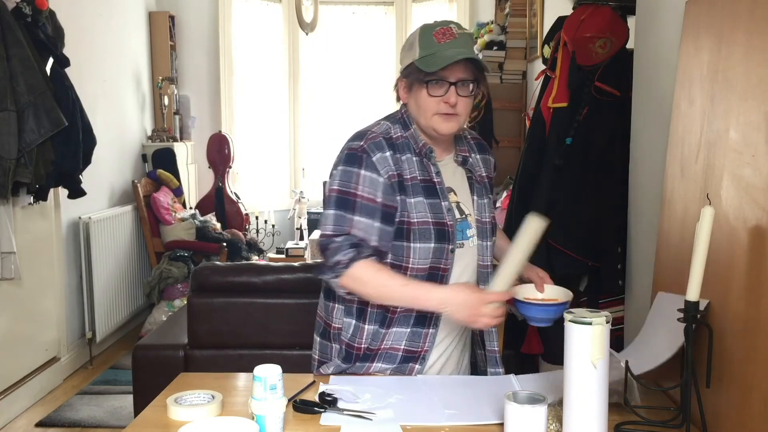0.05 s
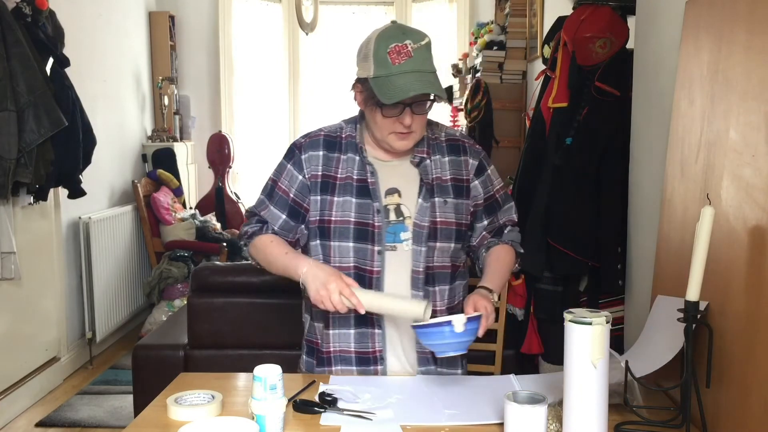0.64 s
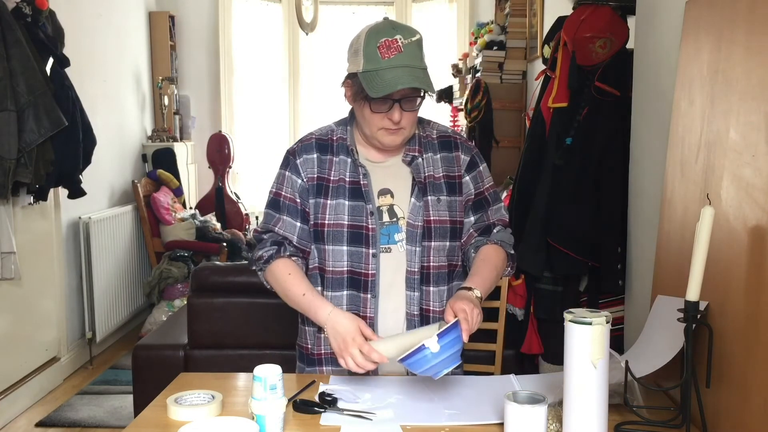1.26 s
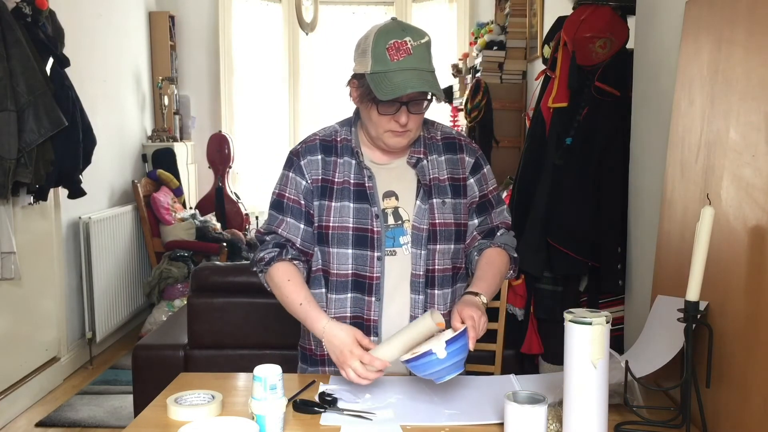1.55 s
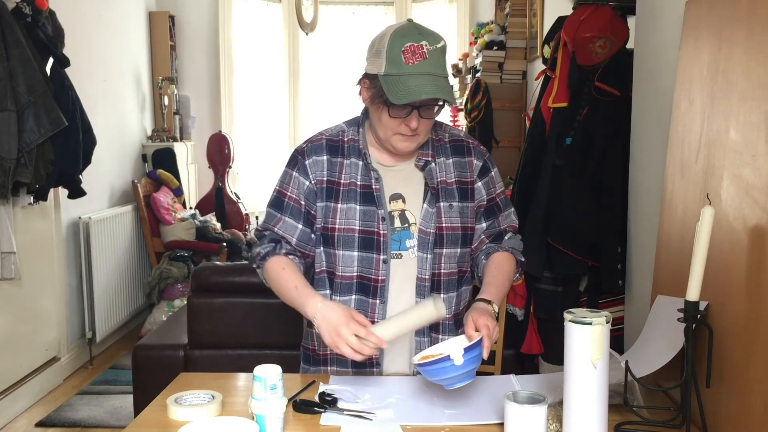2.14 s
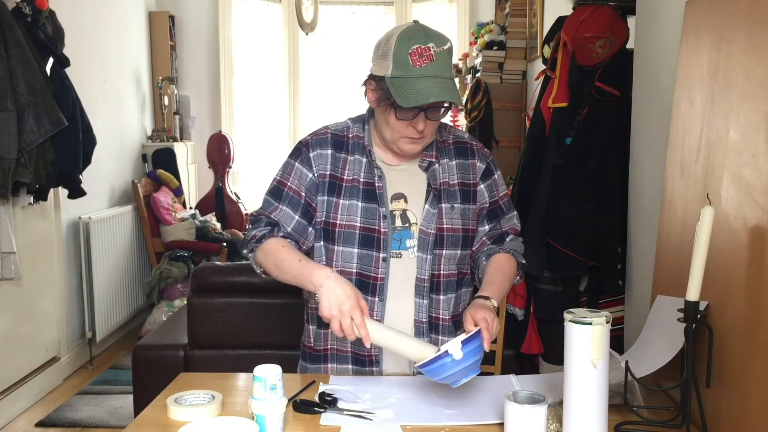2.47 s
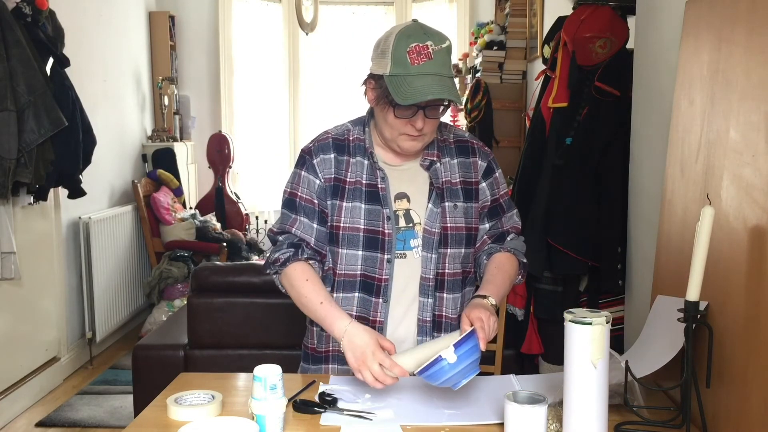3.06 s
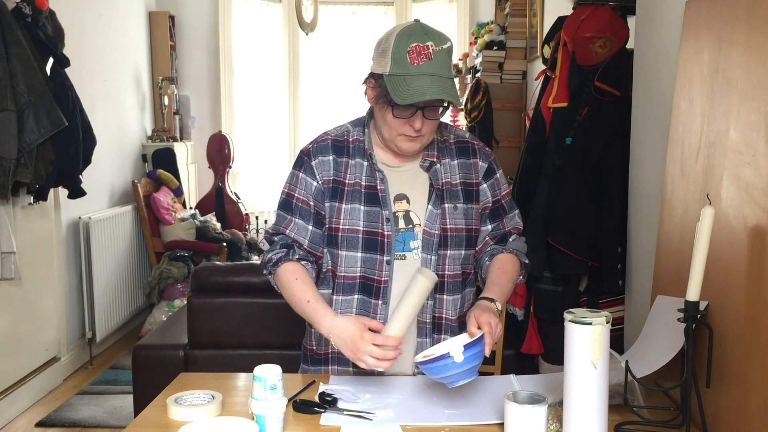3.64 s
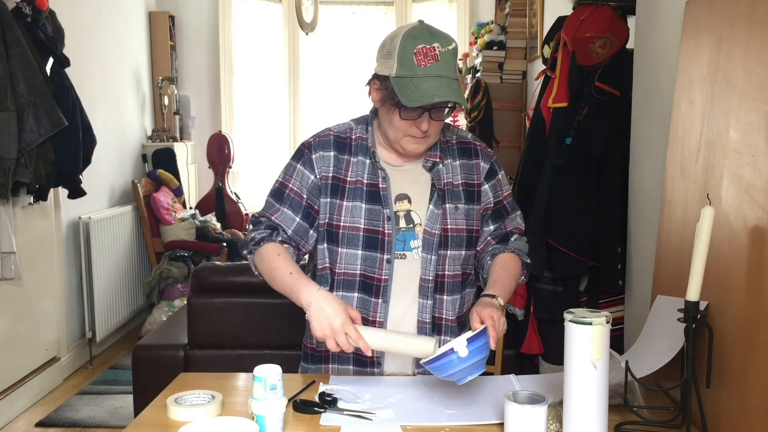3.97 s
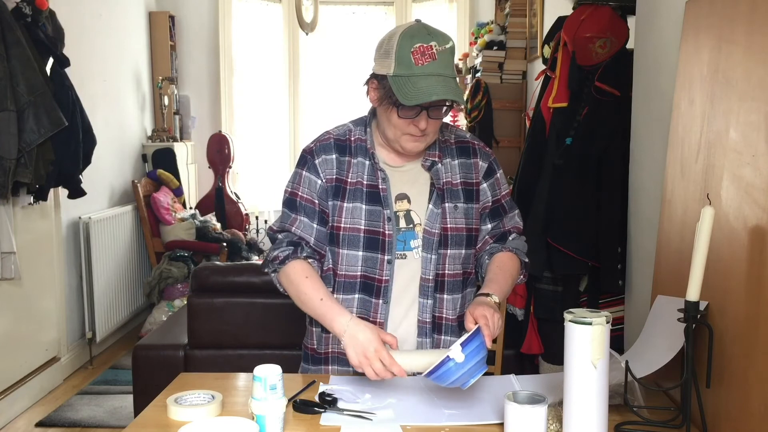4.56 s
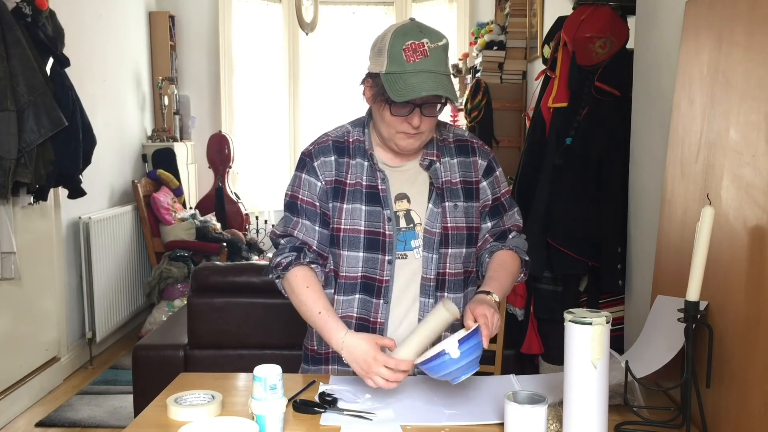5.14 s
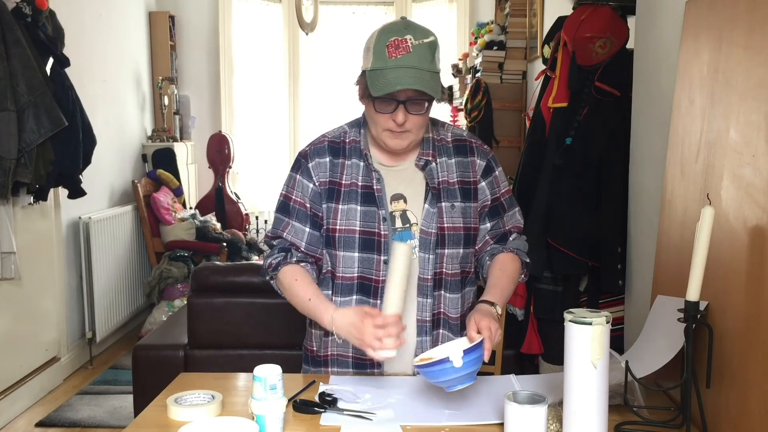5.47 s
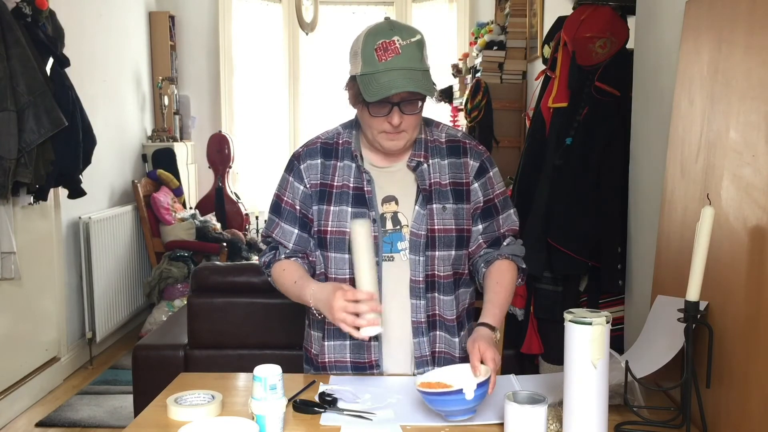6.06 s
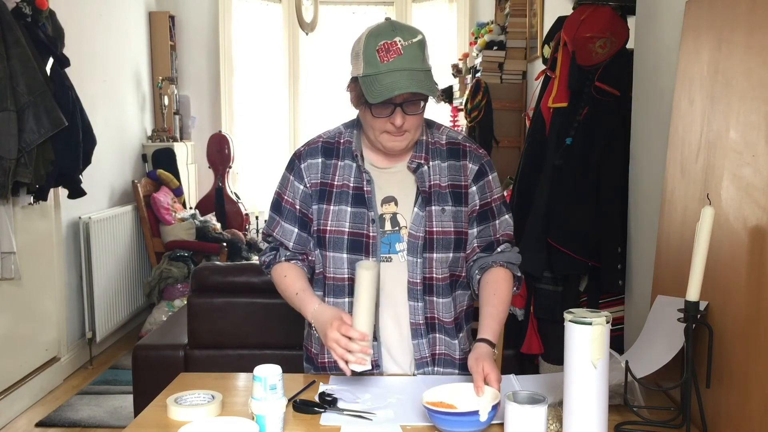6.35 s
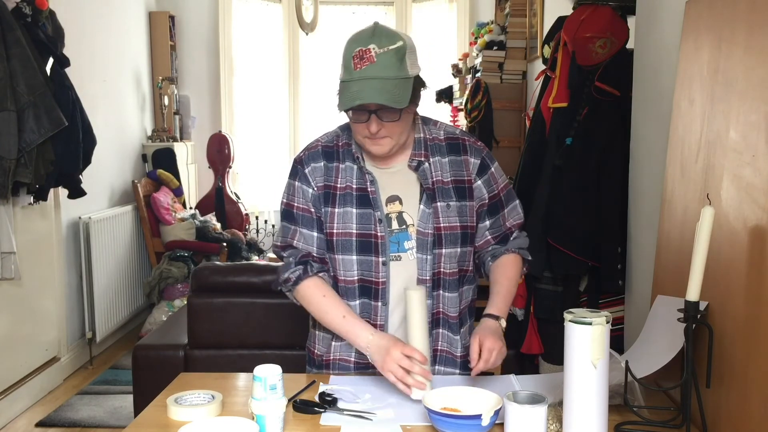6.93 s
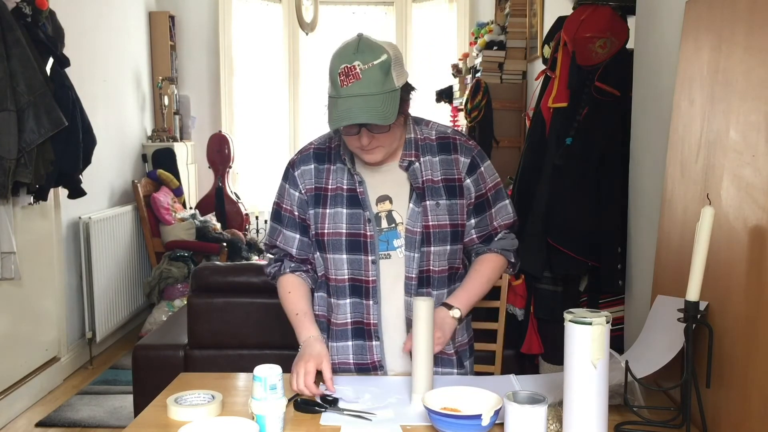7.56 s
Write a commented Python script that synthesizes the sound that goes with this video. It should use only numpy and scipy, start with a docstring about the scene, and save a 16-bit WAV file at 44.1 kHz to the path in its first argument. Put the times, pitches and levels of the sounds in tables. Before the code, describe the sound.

Dry lentils rattle down a cardboard tube three times and are shaken, then a bowl and the tube knock onto a wooden table.

```python
"""A bowl of dry lentils clacks as it is lifted. Three times a cardboard tube crunches into them and is
tipped upright: they slide down, hissing, rattling and sounding its wall and hollow note. The tube is
shaken; the filling swishes and lands as a lump. The bowl rocks flat on a wooden table, the full tube
thuds down, scissors click on the tabletop. Throughout: a small furnished room with a faint hum."""
import sys
import numpy as np
from scipy import signal
from scipy.fft import rfft, irfft, next_fast_len
from scipy.io import wavfile
from scipy.ndimage import uniform_filter1d

SR = 44100
rng = np.random.default_rng(int(sys.argv[2]) if len(sys.argv) > 2 else 0)


def materialize(psi):
    """Save the field psi as 16-bit PCM at rate SR to the path in sys.argv[1].

    A 1-D psi becomes a single channel; in a 2-D psi each row is a channel.
    """
    bounded = np.clip(np.atleast_2d(psi).T, -1, 1)
    quanta = np.round(bounded * 32767).astype(np.int16)
    wavfile.write(sys.argv[1], SR, quanta)


N = 344179
TIME_S = np.arange(N) / SR

# tube ploughs in, lentils creep on until it is tipped: t/s, crunch/dB, release/s, creep/dB
SCOOPS = [(0.958, -52, 0.13, -71.5), (2.63, -52, .21, -71.5), (4.271, -54, 0.2, -68)]
# short shoves of the tube: t/s, crunch/dB, attack/s, hold/s, release/s, wall re crunch/dB
SHOVES = [(1.276, -56.5, 0.12, .018, 0.027, -1), (2.2, -75, .05, 0.26, .2, -3),
          (2.451, -56, .02, 0.034, 0.085, -20), (4.061, -58, .02, .06, 0.11, -7)]
# flow down the tube: first slip/s, full flow/s, run-out/s, flow rise/dB, hiss/dB, rattle/dB,
# wall/dB, hollow note/Hz
POURS = [(1.352, 1.729, 1.931, 27.5, -40.5, -45.5, -58.5, 1270),
         (3.209, 3.42, 3.65, 15.5, -42, -50, -54.5, 1280),
         (4.948, 5.212, 5.38, 10, -46, -54.5, -57.5, 1090)]
# bulk of a pour hits the tube's end: t/s, wall/dB, rattle/dB, hold/s, release/s
LANDINGS = [(1.687, -48, -51.5, 0.15, 0.16), (3.477, -40.5, -41.5, 0.018, 0.11),
            (5.351, -59.5, -46.5, .015, 0.101)]
# filling jumps in the tube, and a few stray lentil ticks: t/s, level/dB, attack/s, release/s
JOLTS = [(.524, -61, .065, .055), (2.12, -62, 0.0087, .07), (2.3, -66, .006, 0.066),
         (5.847, -39, .037, 0.083), (6.023, -49.5, 0.013, 0.075), (6.213, -54.5, 0.027, 0.041),
         (7.091, -48, 0.0054, 0.11), (7.25, -74, 0.041, .05)]

# blows, each with its own loudness and brightness: t/s, level/dB, tilt/(dB/octave)
BOWL_LIFT = [(.006, -25, 1.5), (.012, -22.5, 1)]
BOWL_TAPS = [(.736, -46.5, -2), (.747, -44.5, -6), (4.056, -45.5, -2), (4.068, -46.5, -5.5)]  # tube pushed into the bowl
FINGER_TICKS = [(.355, -58.5, 1), (.361, -60, -2), (.376, -64.5, -6.5), (.613, -67, -2), (.631, -72.5, -7),
                (2.132, -53, 1), (3.903, -74, 10)]  # regripping the tube
SLUMPS = [(1.666, -61, -4), (1.703, -59, 3), (3.471, -39, 1.5), (3.485, -34.5, 3), (5.846, -33.5, -4),
          (5.866, -53, 0.5)]  # filling drops to the tube's end
BOWL_DOWN = [(6.469, -14, 0.25), (6.610, -25.5, -2.5), (6.619, -35.5, -4), (6.642, -31.5, -4)]  # foot meets the table, rocks flat
TUBE_DOWN = [(6.420, -55, -0.56), (7.094, -23, -0.2)]  # table brushed, then full tube stood on it
SCISSOR_CLICKS = [(7.609, -65, 3), (7.678, -40.5, 0.4)]

# clear modes: f/Hz, level/dB, t60/s
LIFT_MODES = [(151.6, 2.5, 0.17), (193, -10.5, 0.51), (397, 1, 0.3), (450, 4.5, 0.17), (604, -8.5, .18),
              (1000, 2, 0.068), (1286, -4.5, 0.15), (1670, -8, .15), (2110, -11.5, .12)]
BOWL_MODES = [(444, -24, 0.068), (522, -4, 0.19), (643, -8.5, 0.24), (1010, -1, 0.23), (1112, 5, 0.3),
              (1390, 5, 0.053), (1654, 4, 0.085), (2170, -5, 0.16), (2900, -6, 0.09), (3550, 7, 0.062),
              (5469, 2, .12)]
WALL_MODES = [(1254, 2, 0.17), (1450, 0, 0.13), (2272, -6, 0.12), (3375, -21, 0.29), (4050, -10, 0.16),
              (4414, -12.5, 0.13)]
TUBE_MODES = [(418, 0.5, 0.12), (515, -6.5, 0.21), (602, -2.5, 0.21), (819, 0.5, 0.2), (1100, -6, 0.29),
              (1373, 6, 0.14), (1628, 2.5, 0.12), (2078, 3, 0.13)]
TABLE_MODES = [(118, -7.5, 0.0997), (149.6, -6.5, 0.14), (174, -16, 0.18), (278, -12.5, 0.16),
               (291, -15, 0.23), (441, -13.5, 0.15), (588, -9, .2), (650, -3, .2), (718, -8, 0.18),
               (815, -11.5, 0.26), (950, -5, 0.1), (1046, -2.5, 0.2), (1152, -8.5, 0.22), (1322, 1.5, 0.15),
               (1470, -23.5, 0.18), (1636, -20, 0.2), (1950, -17.5, 0.18), (2670, -27.5, 0.1),
               (3680, -32.5, 0.16)]
THUD_MODES = [(65.1, -23.5, 0.29), (138, -1, 0.099), (172.4, -4, 0.077), (158.6, -19.5, 0.41),
              (160.7, -16, 0.35), (223.5, -14.5, 0.2)]  # tabletop; a low thud with a faint ring near 160 Hz
SCISSOR_MODES = [(206, -1, 0.1), (290, -11.5, 0.22), (1287, 1, 0.16), (1316, 4, 0.24), (1430, -19, .12),
                 (1780, -9.5, .13), (2140, -10, 0.14)]

# spectra of dense, short-lived modes: f/Hz, density/dB
LIFT_COLOUR = [(60, -36.5), (140, -2), (217, -8.5), (417, -0.5), (880, -8.5), (1050, -2), (1330, 0.5),
               (1810, -13), (2120, -10), (2700, -16), (4200, -18), (8500, -27.5), (15500, -46.5)]
TAP_COLOUR = [(130, -39), (220, -30.5), (500, -12), (640, -5), (870, -17), (1100, -6.5), (1300, 2),
              (1520, -21), (2150, -14), (2600, -21), (3700, -16), (4300, -27), (5600, -17.5), (8000, -29),
              (15600, -38)]
TICK_COLOUR = [(300, -18.5), (750, -5), (1150, 1.5), (1600, -0.5), (2200, 1), (3000, -7), (4200, -6.5),
               (7000, -17.5), (15000, -29)]
SLUMP_COLOUR = [(130, -50), (220, -27.5), (446, -5), (917, -4.5), (1140, 2.5), (1660, 0.5), (1910, -12),
                (2420, -1.5), (2650, -11), (4500, -18), (5850, -60), (9900, -120)]
TABLE_COLOUR = [(50, -29), (90, -15.5), (150, -6), (250, -7), (340, -12), (480, -5), (640, -5), (950, -0.5),
                (1350, -3.5), (1700, -9), (2700, -22.5), (4200, -31), (5200, -45.5), (8000, -53),
                (15000, -74.5)]
THUD_COLOUR = [(30, -51.5), (50, -24), (150, -7.5), (250, -15), (500, -28.5), (950, -31), (1400, -38),
               (3500, -50), (6000, -74)]
CLICK_COLOUR = [(65, -23.5), (110, -16), (224, -3), (350, -11), (568, -6.5), (750, -12.5), (1330, -3),
                (1840, -9.5), (3060, -20.5), (5080, -37.5), (14000, -44)]

# spectra of lentil contacts: f/Hz, density/dB
CRUNCH_COLOUR = [(180, -43), (300, -18), (493, -9), (545, -18), (654, -8.5), (747, -15), (1130, -4.5),
                 (1520, -9.5), (2310, -3.5), (2630, -5.5), (3670, -1), (9290, -8.5), (15800, -16)]
HISS_COLOUR = [(1500, -30.5), (3500, -1.5), (7000, -2.5), (7700, -2), (9300, 2.5), (10500, -5),
               (11600, 1.5), (15500, -1)]
RATTLE_COLOUR = [(400, -58), (1200, -34), (2800, -8.5), (3500, -4), (5000, -3.5), (6900, 0.5), (7700, -9),
                 (15000, -13.5)]
SWISH_COLOUR = [(700, -20), (1300, -11), (2400, -14), (3200, -8.5), (5000, -6.5), (6500, -5.5), (7600, -10),
                (9000, -6.5), (10500, -13), (12000, -9.5), (15800, -11.5)]

# tube resonances: f/Hz, width/Hz, level/dB
CARDBOARD = [(810, 600, -11), (1097, 93, 2.5), (1334, 95, 0), (1637, 86, 1.5), (1823, 140, 2),
             (2290, 430, -1.5), (4530, 240, -5.5)]
AIR_COLUMN = [(407, 50, -10.5), (670, 89, -3.5), (810, 85, -3), (1282, 51, -3), (1750, 63, -3),
              (2510, 110, -6.5)]  # nearly empty tube

# room air: f/Hz, density/dB
AIR_COLOUR = [(15, -52), (27, -17), (102, -4.5), (123, -13.5), (161, -11), (241, -13.5), (403, -15.5),
              (500, -18), (637, -18), (1090, -18.5), (1550, -19.5), (2520, -23), (3220, -22.5),
              (15800, -32.5)]
# room decay: f/Hz, t60/s
ROOM_T60 = [(100, 0.45), (300, 0.28), (1200, 0.36), (3000, .36), (6000, 0.23), (14000, 0.12)]


def pouring():
    """Flow grows with tilt, lands, runs out: sliding hisses, tumbling rattles, both sound the wall."""
    tumble_db_per_s, pile_damping_db_per_s = 11, 46
    wall_share = 0.57  # of the flow's rise in dB
    hiss, rattle, wall = np.zeros((3, N))
    for slip_s, full_s, out_s, rise_db, hiss_db, rattle_db, wall_db, _ in POURS:
        running = swell(slip_s, attack_s=0.083, hold_s=out_s - slip_s, release_s=0.094, curve=1.22)
        flow_db = -rise_db * np.clip((full_s - TIME_S) / (full_s - slip_s), 0, 1) ** 0.99
        filling_s = np.clip(TIME_S, full_s, out_s) - full_s
        hiss += running * amp(hiss_db + flow_db)
        rattle += running * amp(rattle_db + flow_db + tumble_db_per_s * filling_s)
        wall += running * amp(wall_db + wall_share * flow_db - pile_damping_db_per_s * filling_s)
    for at_s, wall_db, rattle_db, hold_s, release_s in LANDINGS:
        landing = swell(at_s, attack_s=0.018, hold_s=hold_s, release_s=release_s, curve=1.2)
        wall = np.hypot(wall, amp(wall_db) * landing)
        rattle = np.hypot(rattle, amp(rattle_db) * landing)
    return (hiss * grains(HISS_COLOUR, per_s=7000, spread_db=1.5)
            + rattle * grains(RATTLE_COLOUR, per_s=2800, spread_db=6)
            + wall * resonant(contacts(per_s=750, spread_db=3.5), CARDBOARD))


def scooping():
    """Lentils crunch in the bowl and tick against the tube's mouth."""
    stroke_attack_s, stroke_hold_s, mouth_lag_s = 0.12, 0.058, 0.068
    crunch, mouth = np.zeros((2, N))
    for (at_s, db, release_s, creep_db), (tipped_s, *_) in zip(SCOOPS, POURS):
        stroke = swell(at_s, stroke_attack_s, stroke_hold_s, release_s, curve=2.05)
        entry = swell(at_s + mouth_lag_s, stroke_attack_s, stroke_hold_s, release_s, curve=2.05)
        creep = amp(creep_db) * swell(at_s, stroke_attack_s, tipped_s - at_s, release_s, curve=1.8)
        crunch += amp(db) * stroke + creep
        mouth += amp(db - 14) * entry + amp(-3) * creep
    for at_s, db, attack_s, hold_s, release_s, wall_db in SHOVES:
        shove = amp(db) * swell(at_s, attack_s, hold_s, release_s, curve=1.03)
        crunch += shove
        mouth += amp(wall_db) * shove
    return (crunch * grains(CRUNCH_COLOUR, per_s=3200, spread_db=1.5)
            + mouth * resonant(contacts(per_s=570, spread_db=3), CARDBOARD))


def pattering():
    """The first lentils drum on the tube's bare end until they cover it."""
    bare = swell(1.664, attack_s=0.0066, hold_s=0.15, release_s=0.103, curve=0.97)
    return amp(-49.5) * bare * resonant(contacts(per_s=900, spread_db=3), AIR_COLUMN)


def swirling():
    """Lentils shift in the lifted bowl and come to rest."""
    motion = swell(0.013, attack_s=0.012, hold_s=0.15, release_s=0.105, curve=1.1)
    return amp(-45) * motion * grains(CRUNCH_COLOUR, per_s=1700, spread_db=2.5)


def shaking():
    """The filling is thrown up with a swish and lands as one lump."""
    thrown = sum(amp(db) * swell(at_s, attack_s, 0, release_s, curve=1.25)
                 for at_s, db, attack_s, release_s in JOLTS)
    swish = thrown * grains(SWISH_COLOUR, per_s=8400, spread_db=6.5)
    lump = blows(SLUMPS, TUBE_MODES, SLUMP_COLOUR, ring_db=-3, t60_s=0.2, snap_db=-1.5, wet_db=-12.5)
    return swish + lump


def hollow_note_hz(t):
    """Pitch of the tube's air: rises as a scoop fills the mouth, and again at full flow."""
    scoop_rise_s, pour_ratio = 0.17, 1.155
    points = []  # t/s, f/Hz
    for (scoop_s, *_), (slip_s, full_s, out_s, *_, note_hz) in zip(SCOOPS, POURS):
        points += [(scoop_s - scoop_rise_s / 2, 1237), (scoop_s + scoop_rise_s / 2, 1910)]
        points += [(slip_s, note_hz), (full_s, note_hz), (out_s, note_hz * pour_ratio)]
    return np.interp(t, *np.transpose(points))


def in_tube(x, peak_db, width_hz, patchy_db):
    """The shifting pile moves the hollow note and varies the rattle's fine colour."""
    hz, t, spectra = signal.stft(x, SR, nperseg=1024, noverlap=768)
    note_db = peak_db / (1 + (2 * (hz[:, None] - hollow_note_hz(t)) / width_hz) ** 2)
    patches = uniform_filter1d(rng.standard_normal(spectra.shape), size=4, axis=0)
    patches = uniform_filter1d(patches, size=16, axis=1)
    patches_db = patchy_db * unit(patches) / (1 + hz[:, None] / 9000)
    return signal.istft(spectra * amp(note_db + patches_db), SR, nperseg=1024, noverlap=768)[1][:N]


def contacts(per_s, spread_db):
    """Lentil collisions in the room: random ticks of uneven size, rms 1."""
    hits = rng.random(N) < per_s / SR
    sizes = amp(spread_db * np.clip(rng.standard_normal(N), -2, 2))
    return unit(in_room(hits * sizes * rng.choice([-1, 1], N), wet_db=-4.5))


def grains(colour, per_s, spread_db):
    """Collisions shaped by a spectrum, rms 1."""
    return unit(coloured(contacts(per_s, spread_db), lambda hz: along(colour, hz)))


def handling():
    """Knocks of bowl, tube, fingers and scissors."""
    lift = blows(BOWL_LIFT, LIFT_MODES, LIFT_COLOUR, ring_db=-6.5, t60_s=0.033, snap_db=-10, wet_db=-7.5)
    taps = blows(BOWL_TAPS, BOWL_MODES, TAP_COLOUR, ring_db=-4, t60_s=0.033, snap_db=-24, wet_db=-8.5)
    ticks = blows(FINGER_TICKS, WALL_MODES, TICK_COLOUR,
                  ring_db=-9.5, t60_s=0.12, snap_db=-11, wet_db=-14.5)
    bowl = blows(BOWL_DOWN, TABLE_MODES, TABLE_COLOUR,
                 ring_db=-4.5, t60_s=0.072, snap_db=-5.5, wet_db=-8, build_up_s=0.012)
    tube = blows(TUBE_DOWN, THUD_MODES, THUD_COLOUR, ring_db=5.5, t60_s=0.035, snap_db=-9.5, wet_db=-4)
    scissors = blows(SCISSOR_CLICKS, SCISSOR_MODES, CLICK_COLOUR,
                     ring_db=-3, t60_s=0.033, snap_db=-8, wet_db=-1.5, build_up_s=0.00089)
    return lift + taps + ticks + bowl + tube + scissors


def blows(events, modes, colour, ring_db, t60_s, snap_db, wet_db, build_up_s=0.004):
    """Each blow: a snap, a burst of dense modes, a few clear ones ringing on."""
    track = np.zeros(N + SR)
    t = np.arange(SR * 2 // 3) / SR
    for at_s, db, tilt_db in events:
        burst = rng.standard_normal(len(t)) * fade(t, t60_s)
        burst[0] += amp(snap_db) * np.linalg.norm(burst)
        dense = coloured(evened(in_room(burst, wet_db)), lambda hz: along(colour, hz))
        ring = np.zeros(len(t))
        for k, (mode_hz, mode_db, mode_t60_s) in enumerate(modes):
            gain = (-1) ** k * amp(mode_db + rng.standard_normal())
            ring += gain * fade(t, mode_t60_s) * np.sin(2 * np.pi * mode_hz * t)
        ring *= 1 - np.exp(-t / build_up_s)  # standing waves form
        blow = unit(dense) + amp(ring_db) * unit(ring)
        blow = coloured(blow, lambda hz: tilt_db * np.log2(np.clip(hz, 150, 8000) / 1000))
        onset_rms = np.sqrt(np.mean(blow[:SR // 50] ** 2))
        track[round(at_s * SR):][:len(t)] += amp(db) * blow / onset_rms
    return track[:N]


def in_room(x, wet_db):
    """x plus a diffuse tail that dies fastest in the top treble."""
    hz, t, spectra = signal.stft(rng.standard_normal(SR // 2), SR, nperseg=256)
    tail = signal.istft(spectra * fade(t, along(ROOM_T60, hz)[:, None]), SR)[1]
    wall_delay_s = 0.0091
    tail *= 1 - np.exp(-(np.arange(len(tail)) / SR / wall_delay_s) ** 2)
    return x + amp(wet_db) * signal.fftconvolve(x, tail / np.linalg.norm(tail))[:len(x)]


def room_tone(hum_hz=98.3):
    """Still air and the low hum of an appliance."""
    air = unit(filtered(rng.standard_normal(N), lambda hz: amp(along(AIR_COLOUR, hz))))
    return amp(-69.5) * air + amp(-70) * np.sin(2 * np.pi * hum_hz * TIME_S)


def swell(at_s, attack_s, hold_s, release_s, curve):
    """Gain 1 from at_s for hold_s; attack and release span 20 dB each, rounder as curve grows."""
    t = TIME_S[::20]
    before = np.maximum(at_s - t, 0) / attack_s
    after = np.maximum(t - at_s - hold_s, 0) / release_s
    return np.interp(TIME_S, t, amp(-20 * np.minimum(before ** curve + after ** curve, 10)))


def fade(t, t60_s):
    """Free decay, 60 dB in t60_s."""
    return np.exp(-np.log(1000) * t / t60_s)


def resonant(x, resonances):
    """x through parallel band-passes of alternating sign, rms 1."""
    def response(hz):
        return sum((-1) ** k * amp(db) * 1j * hz * width_hz / (f_hz ** 2 - hz ** 2 + 1j * hz * width_hz)
                   for k, (f_hz, width_hz, db) in enumerate(resonances))
    return unit(filtered(x, response))


def evened(x):
    """x with its broad spectral lumps levelled; fine modes stay."""
    bins_hz = np.fft.rfftfreq(len(x), 1 / SR)
    power = np.abs(uniform_filter1d(np.abs(rfft(x)) ** 2, size=130))
    return coloured(x, lambda hz: -10 * np.log10(np.interp(hz, bins_hz, power / power.mean()) + 1e-9))


def coloured(x, gain_db, size=8192):
    """x through the minimum-phase filter with curve gain_db(hz)."""
    gain = amp(gain_db(np.fft.rfftfreq(size, 1 / SR)))
    cepstrum = irfft(np.log(np.maximum(gain, 1e-6)))
    cepstrum[1:size // 2] *= 2
    cepstrum[size // 2 + 1:] = 0
    return signal.fftconvolve(x, irfft(np.exp(rfft(cepstrum))))[:len(x)]


def filtered(x, response):
    """x with its spectrum times response(hz)."""
    size = next_fast_len(len(x) + SR // 4)
    return irfft(rfft(x, size) * response(np.fft.rfftfreq(size, 1 / SR)), size)[:len(x)]


def along(points, hz):
    """(f/Hz, value) points joined on a log axis."""
    points_hz, values = np.transpose(points)
    return np.interp(np.log(hz + 1), np.log(points_hz + 1), values)


def amp(db):
    """dB to gain."""
    return 10 ** (np.asarray(db) / 20)


def unit(x):
    """x at rms 1."""
    return x / np.sqrt(np.mean(x ** 2) + 1e-20)


def scene():
    """All sources at one microphone across the table."""
    lentils = swirling() + scooping() + pouring() + pattering()
    lentils = in_tube(lentils, peak_db=7.5, width_hz=63, patchy_db=3.5)
    return (lentils + shaking() + handling() + room_tone())[None]


def record(dry):
    """Brick-wall low-pass."""
    top_hz = 15780
    return np.array([filtered(channel, lambda hz: hz < top_hz) for channel in dry])


dry = scene()
out = record(dry)
materialize(out)
```